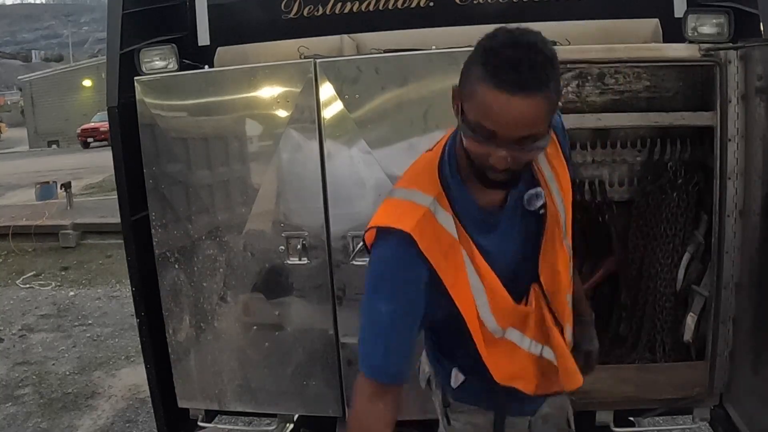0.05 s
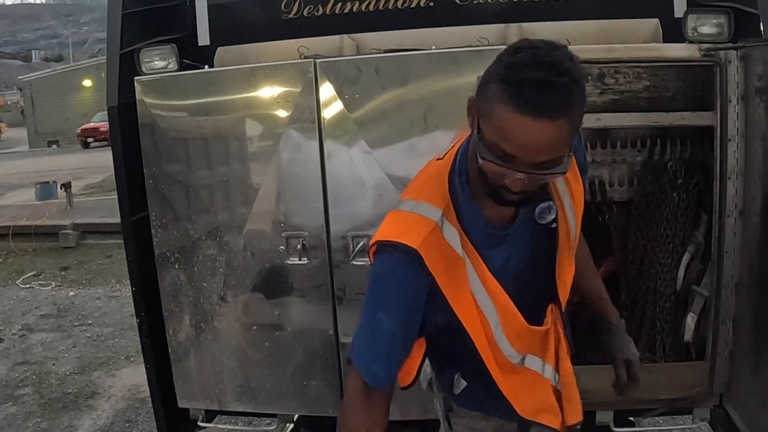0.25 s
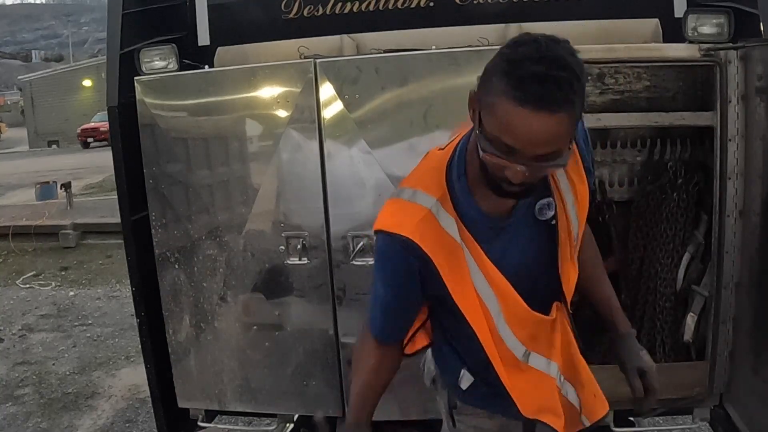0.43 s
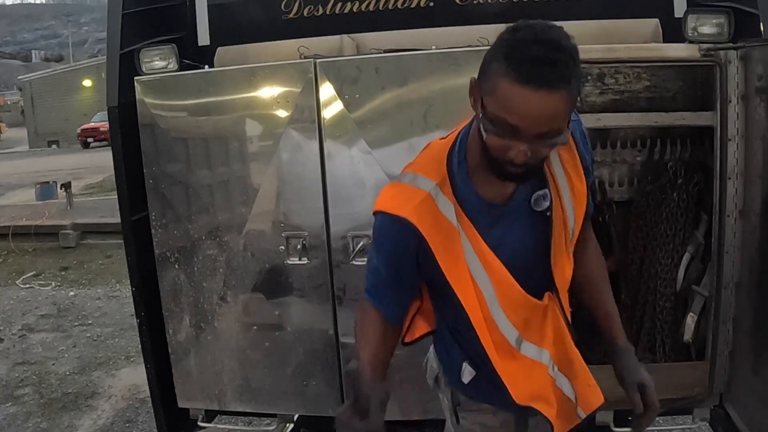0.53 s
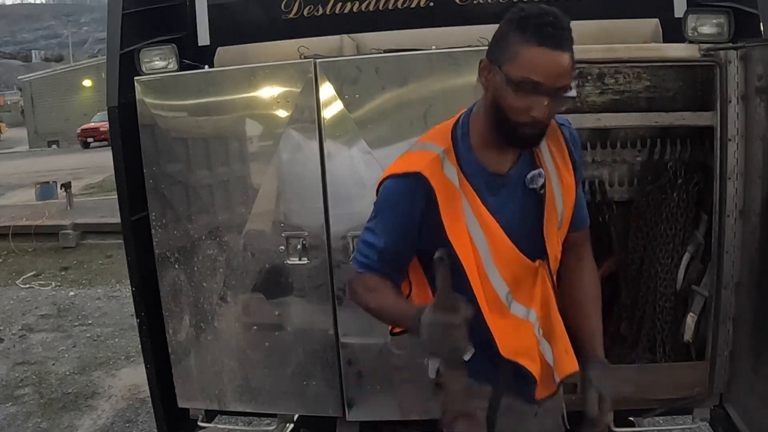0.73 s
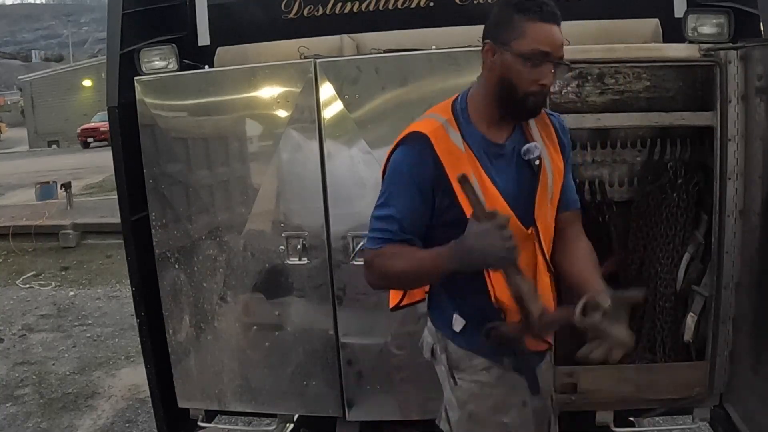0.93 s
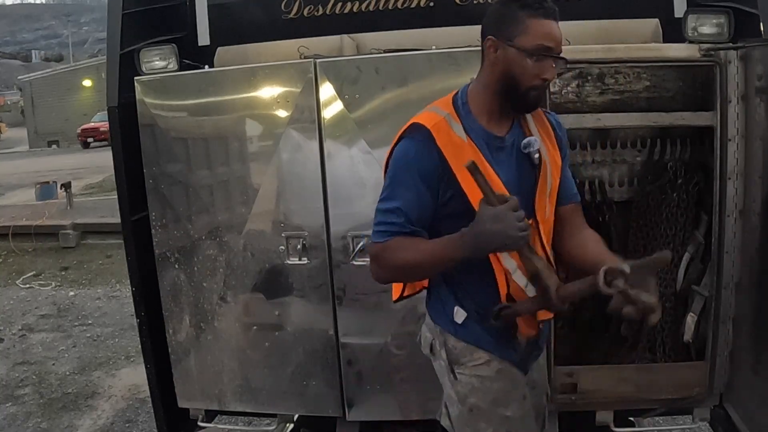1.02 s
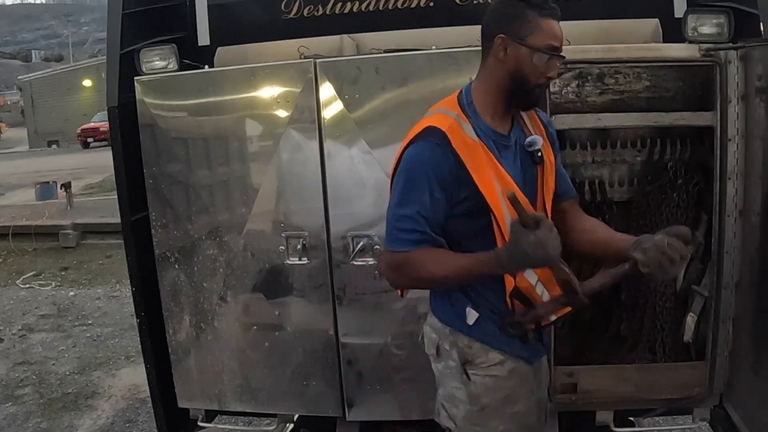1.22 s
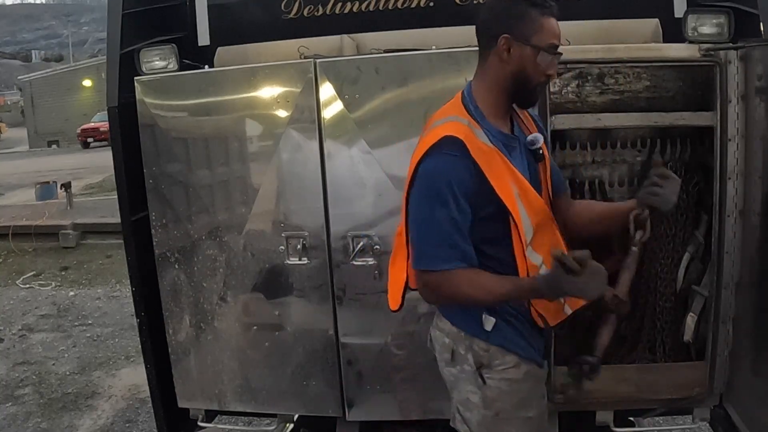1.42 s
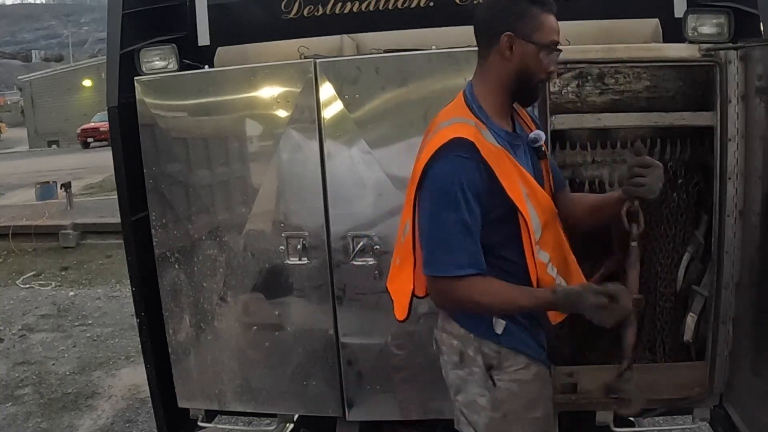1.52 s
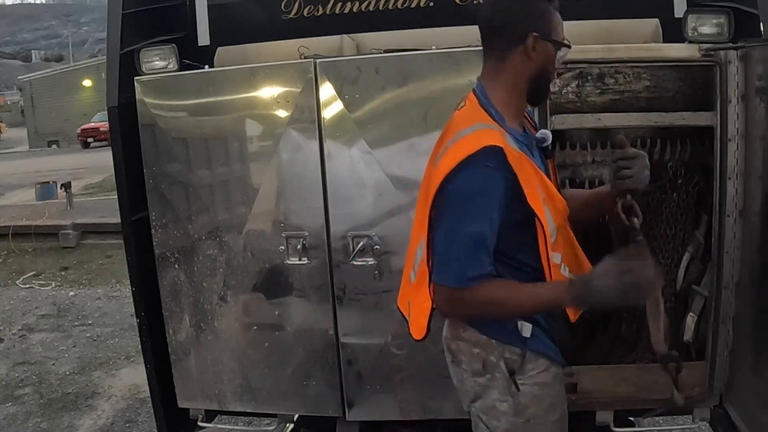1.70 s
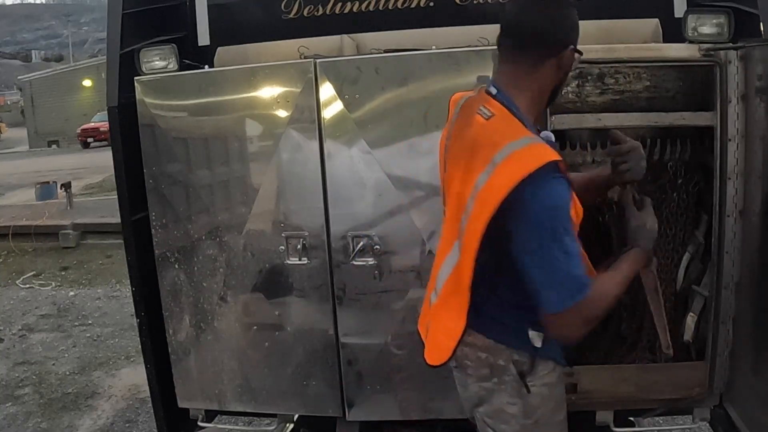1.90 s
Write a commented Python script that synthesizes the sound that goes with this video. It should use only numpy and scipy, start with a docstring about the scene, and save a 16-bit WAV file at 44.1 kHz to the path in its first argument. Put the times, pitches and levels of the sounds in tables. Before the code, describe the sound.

Steel chain binders knock and scrape off a hollow deck, then clank together while being lifted

```python
"""On a truck in a yard, steel chain binders are dragged off a hollow deck, knocking on it, then clank together
as they are lifted to hooks. Each clank is a short noise crack and chatter plus decaying modes of forged steel;
the deck knocks are lower modes with a crack, and the drag is small random contacts over a jerky scrape.
Dull thuds, a light rustle, a low machine hum and yard noise lie beneath.
The sound is almost wholly on the right channel, with only a trace on the left."""
import sys
import numpy as np
from scipy import signal
from scipy.fft import rfft, irfft
from scipy.io import wavfile
from scipy.ndimage import uniform_filter1d

SR = 44100
rng = np.random.default_rng(int(sys.argv[2]) if len(sys.argv) > 2 else 0)


def store_wav(level_fs):
    """Save 16-bit WAV to argv[1]."""
    pcm = np.round(np.clip(np.atleast_2d(level_fs), -1, 1) * 32767)
    wavfile.write(sys.argv[1], SR, pcm.T.astype(np.int16))


N = 85995  # length in samples

# Colour of steel bumping and scraping on the deck. Each row: frequency in Hz, relative level in dB.
DECK_COLOUR = [(100, -29.5), (450, -0.5), (850, 6), (1500, -6.5), (3200, -10.5), (4500, -20.5), (8000, -32),
               (10000, -62)]


def undb(db):
    """Turn decibels into an amplitude factor."""
    return 10 ** (np.asarray(db) / 20)


def fade(t60):
    """Exponential decay from time zero, falling 60 dB in t60 seconds."""
    return np.exp(-np.log(1000) * np.arange(N) / SR / t60)


def curve(points):
    """Gain along (seconds, dB) points, with straight lines in dB between them."""
    return undb(np.interp(np.arange(N) / SR, *np.array(points).T))


def walk(rate):
    """Smooth random wander with a spread near 1, taking about `rate` new values per second."""
    k = max(int(SR / rate), 1)
    steps = np.repeat(rng.standard_normal(N // k + 1), k)
    return 1.2 * uniform_filter1d(steps, k)[:N]


def ring(hz, t60, push=0.00056, count=22000):
    """One struck mode: a decaying sine that builds up over the push of the contact in seconds."""
    t = np.arange(count) / SR
    decay = np.exp(-np.log(1000) * t / t60)
    build_up = 1 - np.exp(-(t / push) ** 2)
    return np.sin(2 * np.pi * hz * t) * decay * build_up


def response(points, tilt=((1, 0), (2, 0)), ripple_db=0, size=2048):
    """Minimum-phase response: a level-matched (Hz, dB) colour with random ripple, weighted by a (Hz, dB) tilt."""
    hz = np.arange(size // 2 + 1) * SR / size
    ripple_hz = 170.1  # spacing of the random peaks and dips

    def gain(rows):
        freqs, levels = zip(*rows)
        return undb(np.interp(np.log(hz + 1), np.log(freqs), levels))

    ripple = np.interp(hz / ripple_hz, np.arange(size), rng.uniform(-1.85, 1.8, size))
    coloured = gain(points) * undb(ripple_db * ripple)
    coloured /= np.sqrt(np.mean(coloured ** 2))
    # folding the cepstrum puts the energy as early as possible, so attacks stay sharp
    cepstrum = irfft(np.log(coloured * gain(tilt)))
    cepstrum[1:size // 2] *= 2
    cepstrum[size // 2 + 1:] = 0
    return irfft(np.exp(rfft(cepstrum)))


def noise(envelope, *colour):
    """White noise shaped by an envelope, then coloured."""
    return signal.fftconvolve(envelope * rng.standard_normal(N), response(*colour))[:N]


def add(out, at, sound):
    """Lay a sound into the track at a time in seconds."""
    i = max(int(at * SR), 0)
    part = sound[:N - i]
    out[i:i + len(part)] += part


def clanks():
    """Steel contacts crack, chatter and excite the steel's modes; the deck mutes the top until the lift."""
    # Steel on steel. Each row: start in seconds, level around 2.6 kHz in dB, level around 7 kHz in dB.
    blows = [(.142, -30.5, -50.5), (0.1612, -25, -32.5), (.178, -18.5, -49.5), (.184, -30, -66),
             (.220, -29.5, -38.5), (.267, -29.5, -66), (.350, -26, -42), (0.374, -31, -36.5),
             (0.394, -29, -35), (.411, -35, -41.5), (0.451, -29.5, -38), (0.4704, -22, -28.5),
             (0.5757, -34.5, -47.5), (0.7194, -32.5, -45), (.8138, -33.5, -38.5), (1.021, -53, -69),
             (1.132, -32, -41.5), (1.2002, -33, -39.5), (1.234, -36.5, -55.5), (1.292, -38.5, -51.5),
             (1.397, -29.5, -28), (1.402, -20.5, -23.5), (1.4399, -27.5, -63), (1.465, -40.5, -60),
             (1.516, -19, -33), (1.528, -62, -28.5), (1.539, -25, -27.5), (1.599, -37.5, -60),
             (1.645, -34.5, -56), (1.6608, -21.5, -31.5), (1.832, -44.5, -71)]
    # Modes of the forged steel. Each row: frequency in Hz, level relative to the blow in dB, t60 in seconds.
    modes = [(629, -26.5, 0.062), (1340, -7, 0.031), (2194, -12, 0.1), (3140, -5, 0.04),
             (3435, -10.5, 0.089), (5270, -4.5, 0.079), (6600, -4, 0.078), (7140, -8.5, 0.093),
             (8300, 0, 0.023), (10270, -22, 0.16), (14370, -40, 0.07)]
    # Colour of the crack. Each row: frequency in Hz, relative level in dB.
    crack_colour = [(120, -14.5), (650, -5), (1500, -10), (2400, 5.5), (4100, 0.5), (8400, 1), (9400, -14),
                    (15000, -44.5)]
    crack_db, crack_t60_s = 6, 0.032
    chatter_db, chatter_t60_s = -14, 0.13
    contact_s = 0.0039  # time constant (t60) of the onset
    lift_s, muted_db = 0.46, -14.5  # before the lift, the level at 10 kHz is lowered
    spot_db, detune_spread = 1, 0.0073  # each blow lands on a slightly different spot
    ripple_db = 2.5

    out = np.zeros(N)
    anchors = [2600, 7000, 8500, 10000]  # Hz
    crack = undb(crack_db) * fade(crack_t60_s)
    chatter = undb(chatter_db) * fade(chatter_t60_s)
    shape = (crack + chatter) * (1 - fade(contact_s))
    for at, mid, high in blows:
        levels = [mid, high, high, high + muted_db * (at < lift_s)]
        add(out, at, noise(shape, crack_colour, list(zip(anchors, levels)), ripple_db))
        chances = rng.standard_normal((len(modes), 3))
        for (hz, db, t60), (spot, detune, side) in zip(modes, chances):
            force_db = np.interp(np.log(hz), np.log(anchors), levels)
            level = np.sign(side) * undb(db + force_db + spot_db * spot)
            add(out, at, level * ring(hz * (1 + detune_spread * detune), t60))
    return out


def strongest_partials():
    """Strongest partials of single clanks, wavering in level, held briefly and then dying quickly."""
    # Each row: start in seconds, frequency in Hz, level in dB before the waver,
    # time held before the quick decay in seconds.
    partials = [(0.1634, 3140, -24, 0.0033), (.163, 5170, -33.5, 0.0085), (.221, 8010, -33.5, 0.004),
                (.350, 5190, -21.5, 0.0018), (0.394, 5130, -31, 0.005), (.480, 7220, -40, 0.041),
                (.8145, 5145, -34, 0.0083), (1.134, 4790, -37, .003), (1.134, 5130, -42.5, 0.026),
                (1.134, 8170, -29.5, .002), (1.402, 6560, -28.5, 0.0059), (1.4, 7370, -26, 0.00091),
                (1.518, 4834, -26, 0.024), (1.465, 5100, -43.5, 0.0088), (1.661, 1350, -25, 0.0011),
                (1.662, 4490, -27, 0.0015), (1.666, 7920, -23, 0.0048), (1.666, 10040, -67, 0.11)]
    held_t60_s, quick_t60_s = 0.7, 0.039  # the quick decay adds to the slow one
    waver_db = 4.5

    out = np.zeros(N)
    for at, hz, db, held in partials:
        tone = ring(hz, held_t60_s)
        after_hold = np.maximum(np.arange(len(tone)) / SR - held, 0)
        quick_decay = np.exp(-np.log(1000) * after_hold / quick_t60_s)
        add(out, at, undb(db) * tone * quick_decay)
    return out * undb(waver_db * walk(200))


def deck():
    """The binders bump on the hollow deck, exciting its low modes and a short noise crack."""
    # Binder on the deck. Each row: start in seconds, level in dB.
    knocks = [(.156, -28.5), (.179, -27.5), (.217, -30), (.268, -28), (.281, -24), (.320, -28), (.359, -15),
              (.382, -24.5), (.452, -10), (.480, -21.5)]
    # Modes of the deck. Each row: frequency in Hz, level relative to the knock in dB, t60 in seconds.
    deck_modes = [(474, -18.5, 0.035), (675.5, -10.5, 0.058), (820.4, 7, 0.044), (908, -3.5, 0.049),
                  (1103, -2, 0.05), (1437, -13.5, 0.089)]
    push_s, detune_spread = 0.00097, 0.011
    crack_db, crack_t60_s = -5, 0.07

    out = np.zeros(N)
    for at, db in knocks:
        for hz, mode_db, t60 in deck_modes:
            detuned_hz = hz * (1 + detune_spread * rng.standard_normal())
            add(out, at, undb(db + mode_db) * ring(detuned_hz, t60, push_s))
        add(out, at, noise(undb(db + crack_db) * fade(crack_t60_s), DECK_COLOUR))
    return out


def drag():
    """Links catch and slip on the deck in separate small contacts, over a jerky scrape."""
    # Force of the scraping. Each row: time in seconds, level in dB.
    force_points = [(0, -46), (.05, -71.5), (.14, -50), (.17, -28.5), (.205, -40), (.28, -32.5), (.34, -40),
                    (.39, -24.5), (.435, -51.5), (.49, -37), (.64, -71.5)]
    grains_per_s, grain_spread_db, grain_db = 260, 5.5, -2.5
    scrape_db, jerk_db = 0, 1.52

    hits = rng.random(N) < grains_per_s / SR
    grains = hits * rng.choice([-1, 1], N) * undb(grain_spread_db * rng.standard_normal(N))
    grains = undb(grain_db) * grains / grains.std()
    scrape = undb(scrape_db + jerk_db * walk(218.9)) * rng.standard_normal(N)
    contacts = curve(force_points) * (grains + scrape)
    return signal.fftconvolve(contacts, response(DECK_COLOUR, ripple_db=4))[:N]


def thuds():
    """Soft heavy bumps: a low decaying boom that builds up over one cycle, and a dull noise slap."""
    # Each row: start in seconds, boom level in dB, boom frequency in Hz, slap level in dB.
    bumps = [(.18, -44.5, 148, -31), (.595, -41, 92, -51.5), (.745, -38, 100, -50.5),
             (1.167, -29, 75.3, -30)]
    # Colour of the slap. Each row: frequency in Hz, relative level in dB.
    slap_colour = [(40, -49), (90, 1), (290, 9), (12000, -65)]
    boom_t60_s, slap_t60_s = 0.3, 0.34

    out = np.zeros(N)
    for at, db, hz, slap_db in bumps:
        add(out, at, undb(db) * ring(hz, boom_t60_s, 1 / hz))
        add(out, at, noise(undb(slap_db) * fade(slap_t60_s), slap_colour))
    return out


def rustle():
    """Gloves and loose links rub: coloured noise with a fine, fast flicker of level."""
    # Strength of the rubbing. Each row: time in seconds, level in dB before the flicker.
    rubbing = [(0, -69), (1.08, -67.5), (1.15, -54), (1.175, -37), (1.21, -52), (1.35, -57.5),
               (1.38, -42.5), (1.49, -56), (1.8, -65.5), (1.85, -56), (1.95, -63)]
    # Colour of the rubbing. Each row: frequency in Hz, relative level in dB.
    rub_colour = [(300, -2.5), (1500, -9.5), (2700, 0.5), (10000, -25.5), (15000, -51)]
    flicker_db = 2.4
    return noise(curve(rubbing) * undb(flicker_db * walk(270)), rub_colour)


def machine_hum():
    """A low machine hum: a few sines, each wavering slowly in level and pitch."""
    # Each row: centre frequency in Hz, mean RMS level in dB.
    tones = [(138, -55), (279, -58.5), (328, -53.5)]
    waver_db, pitch_waver = 1.5, 0.0039

    out = np.zeros(N)
    for hz, db in tones:
        level = np.sqrt(2) * undb(db + waver_db * walk(11.6))
        phase = 2 * np.pi * np.cumsum(hz * (1 + pitch_waver * walk(9.5))) / SR
        out += level * np.sin(phase)
    return out


def yard():
    """The steady, mostly low noise of the yard."""
    # Colour of the yard. Each row: frequency in Hz, relative level in dB.
    yard_colour = [(25, -9), (70, 0.5), (130, 2), (600, -4.5), (1600, -18), (7000, -41), (15000, -46)]
    yard_db = -52
    return noise(undb(yard_db), yard_colour)


def scatter(near):
    """Diffuse echo from the truck and yard: the sound smeared by a decaying noise tail of unit energy."""
    echo_db, echo_t60_s = -20, 0.22
    tail = fade(echo_t60_s) * rng.standard_normal(N)
    return undb(echo_db) * signal.fftconvolve(near, tail / np.linalg.norm(tail))[:N]


def scene():
    """Mix the steel and deck sounds and their scatter with the thuds, rustle and background."""
    left_db, right_db = -59, 4
    near = clanks() + strongest_partials() + deck() + drag()
    mono = near + scatter(near) + thuds() + rustle() + machine_hum() + yard()
    return np.array([undb(left_db) * mono, undb(right_db) * mono])


def record(dry):
    """Clip peaks at full scale, then cut the top with a steep elliptic low-pass."""
    top_hz = 15700
    low_pass = signal.ellip(8, .2, 70, top_hz, fs=SR, output="sos")
    return signal.sosfilt(low_pass, np.clip(dry, -1, 1))


dry = scene()
out = record(dry)
store_wav(out)
```